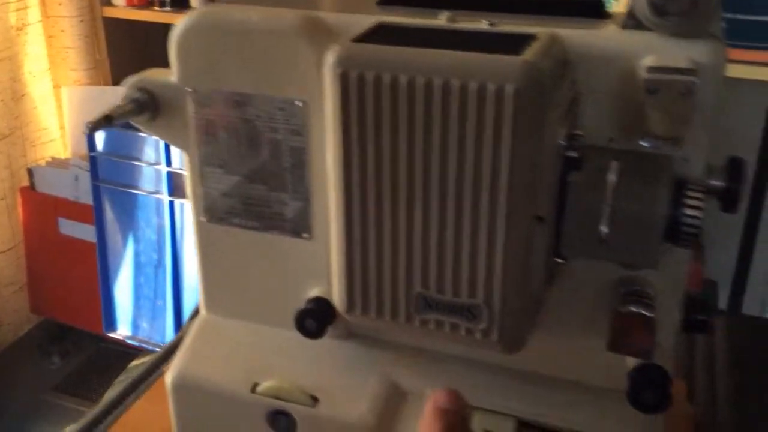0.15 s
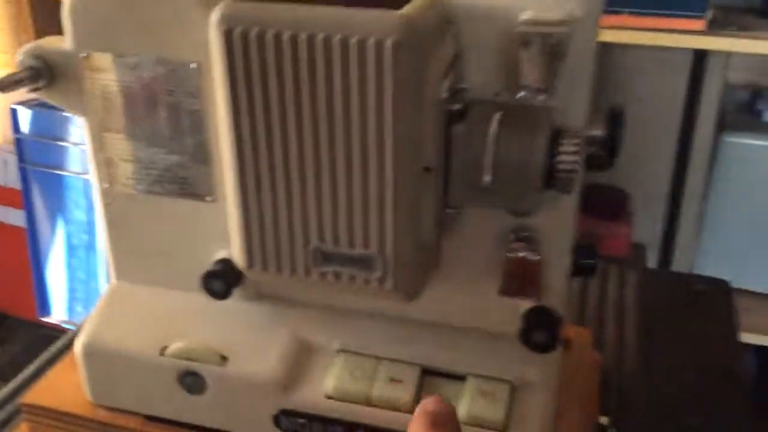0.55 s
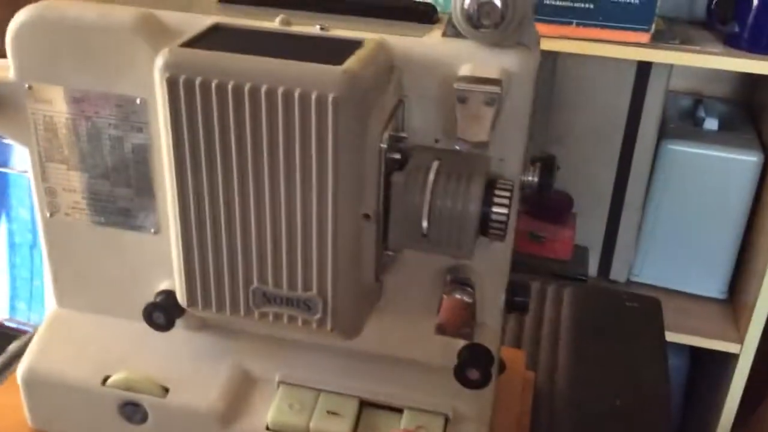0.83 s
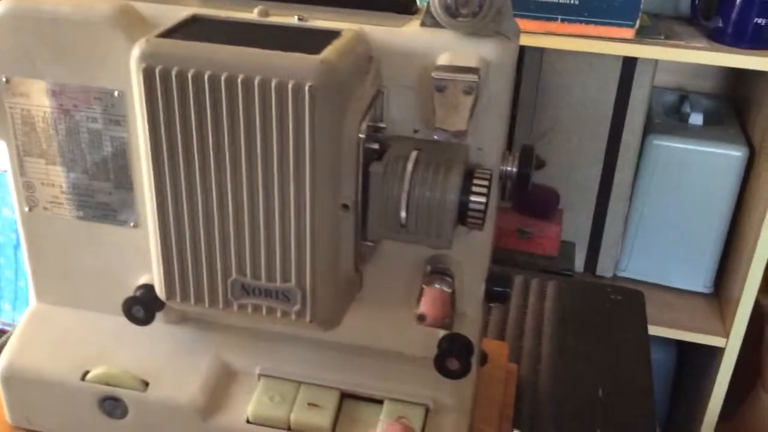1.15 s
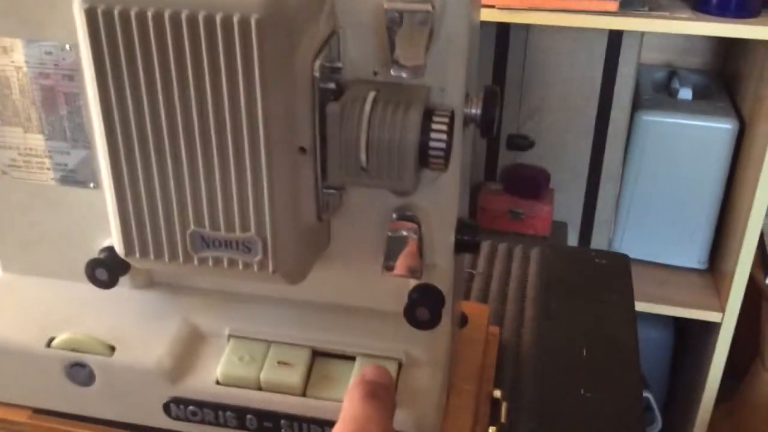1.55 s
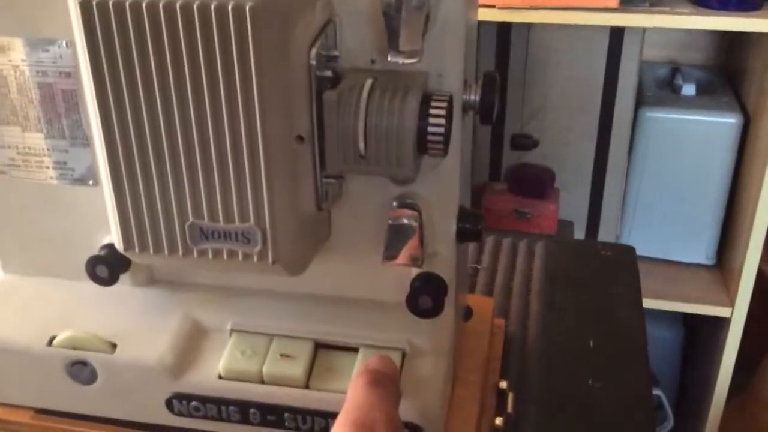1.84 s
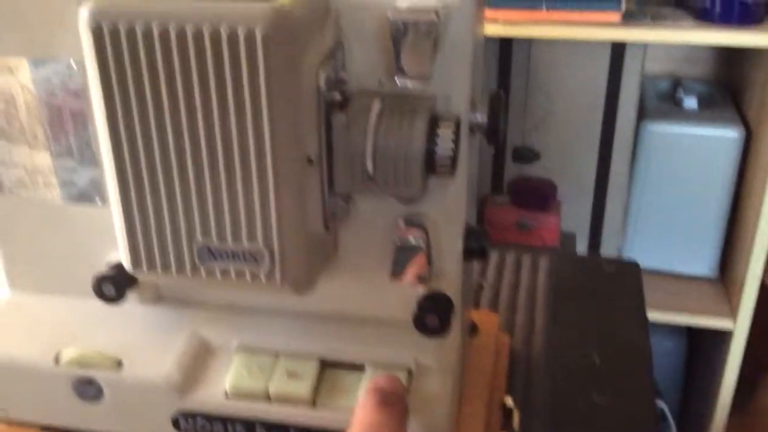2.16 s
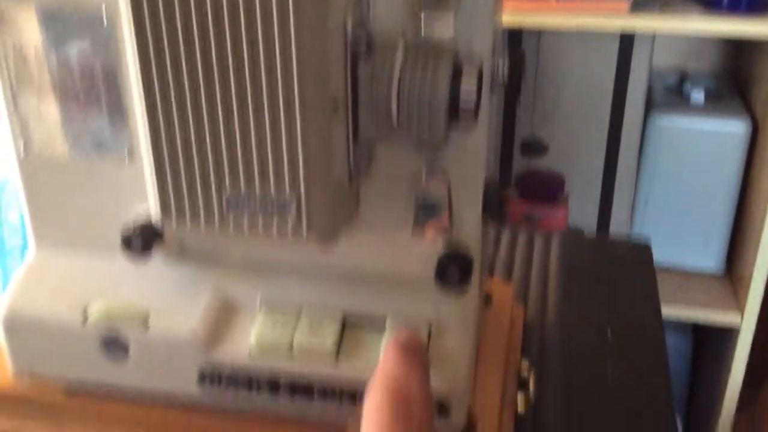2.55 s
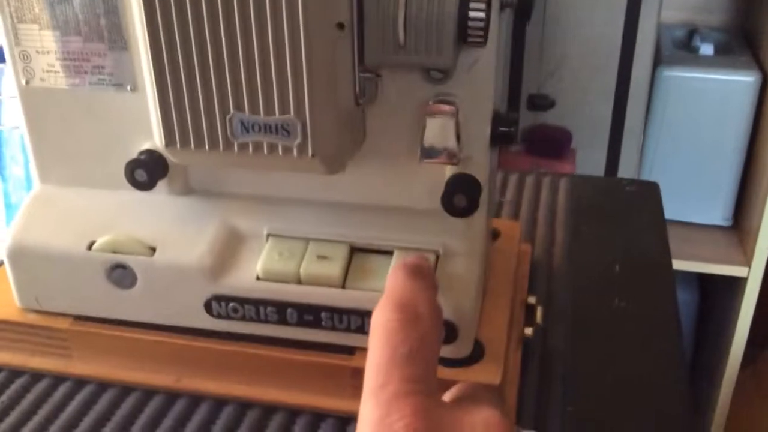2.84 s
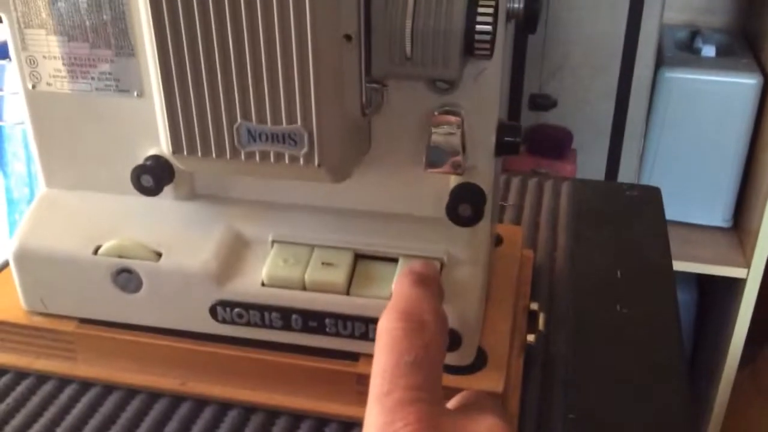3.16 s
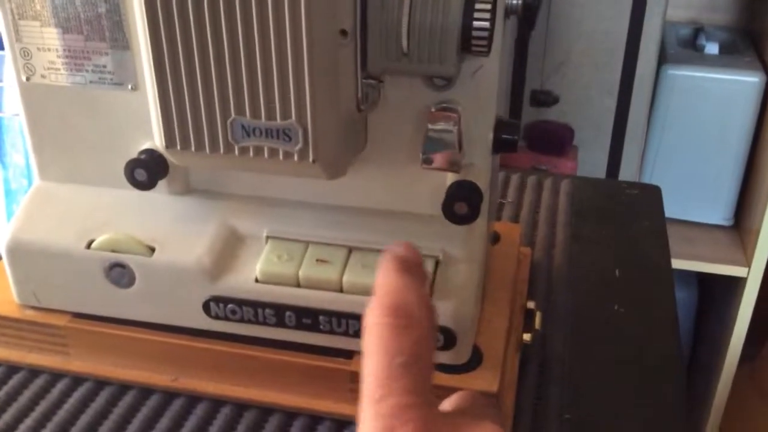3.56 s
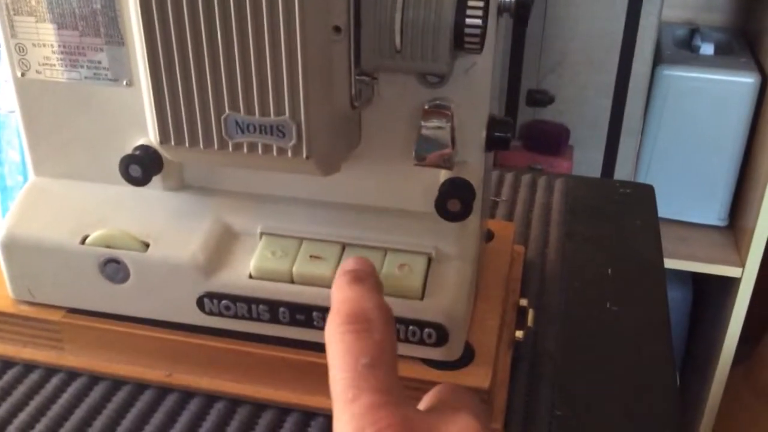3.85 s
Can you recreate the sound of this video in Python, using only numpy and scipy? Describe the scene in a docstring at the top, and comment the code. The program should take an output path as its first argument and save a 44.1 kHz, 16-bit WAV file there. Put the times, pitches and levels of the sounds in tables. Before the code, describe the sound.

A small film projector starts with a clack and runs with a fast, throbbing rattle over motor whine and fan air. A loud button clack stops it and a second button snaps, close to the microphone in a quiet room.

```python
"""A small film projector, close to the microphone in a furnished room, runs up to 18 frames a second.
It engages with a clack and a metallic knock. Each pull of the claw makes the gate throb near 550 Hz,
over motor whine, mains hum, fan air and gear rattle. Near 3.4 s a key clacks loudly and stops the drive;
a second key snaps and settles, leaving the quiet room."""
import sys
import numpy as np
from scipy import signal
from scipy.fft import rfft, irfft
from scipy.io import wavfile
from scipy.ndimage import uniform_filter1d

SR = 44100
rng = np.random.default_rng(int(sys.argv[2]) if len(sys.argv) > 2 else 0)


def put_to_file(sound):
    """Save the sound as 16-bit audio at rate SR, in the file named by the first command-line argument."""
    columns = np.atleast_2d(sound).T  # one column per channel
    safe = np.clip(columns, -1, 1)
    whole_steps = np.round(safe * 32767)
    wavfile.write(sys.argv[1], SR, whole_steps.astype(np.int16))


N = 176400


def undb(db):
    """Decibels to gain."""
    return 10 ** (np.asarray(db) / 20)


def colour(x, spectrum, tilt_db=0):
    """Shape a signal by (freq_hz, level_db) points and a tilt per octave; rms 1."""
    hz, db = np.array(spectrum, float).T
    octave = np.log2(np.maximum(np.fft.rfftfreq(len(x), 1 / SR), 1))
    gain = undb(np.interp(octave, np.log2(hz), db) + tilt_db * np.maximum(octave, np.log2(hz[0])))
    bass_cut = np.minimum(2 ** octave / hz[0], 1) ** 2
    shaped = irfft(rfft(x) * gain * bass_cut, len(x))
    return shaped / np.std(shaped)


def noise(spectrum, tilt_db=0):
    """Coloured noise, rms 1."""
    return colour(rng.standard_normal(N), spectrum, tilt_db)


def drift(rate_hz):
    """Smooth random wandering with spread 1."""
    hold = int(SR / rate_hz)
    steps = np.repeat(rng.standard_normal(N // hold + 1), hold)
    smooth = uniform_filter1d(uniform_filter1d(steps, hold), hold)[:N]
    return smooth / np.std(smooth)


def fade(age, t60_s):
    """Exponential decay that starts at age zero."""
    return (age >= 0) * np.exp(-np.log(1000) * np.maximum(age, 0) / t60_s)


def onset(age, rise_s):
    """Smooth rise from age zero."""
    return 1 - np.exp(-np.maximum(age, 0) / rise_s)


def ring(age, modes):
    """Damped modes struck at age zero."""
    return sum(undb(db) * fade(age, t60_s) * np.sin(2 * np.pi * hz * age) for hz, t60_s, db in modes)


# Rotor whine, loudest as it climbs through a resonance of the casing: time_s, pitch_hz, level_db
ROTOR_WHINE = [(0, 201.3, -86), (.12, 215.9, -66), (0.198, 237.8, -52), (.259, 242.5, -45.5),
               (.339, 247, -48), (.48, 251, -57), (.9, 263, -55), (1.22, 258.5, -52.5), (1.45, 264, -54.5),
               (1.78, 266.5, -57), (1.99, 258.5, -54), (2.47, 267, -58), (2.72, 263, -53), (3.35, 265, -57)]
# Its overtones: harmonic_number, level_db
WHINE_OVERTONES = [(2, -58.5), (3, -63.5), (4, -63)]
# Mains hum without strain: pitch_hz, level_db
MAINS_HUM = [(100, -80), (200, -61.7)]

def motor(t, strain, waver_db=0.5, wobble=0.003, strain_db=10):
    """The rotor whines; the windings hum, more strongly while the motor pulls up."""
    times, pitch_hz, level_db = np.array(ROTOR_WHINE).T
    phase = 2 * np.pi * np.cumsum(np.interp(t, times, pitch_hz) * (1 + wobble * drift(25))) / SR
    whine = undb(np.interp(t, times, level_db) + waver_db * drift(17)) * np.sin(phase)
    whine += sum(undb(db + waver_db * drift(11)) * np.sin(n * phase) for n, db in WHINE_OVERTONES)
    hum = sum(undb(db + strain_db * strain + 2.5 * drift(6.6)) * np.sin(2 * np.pi * hz * t)
              for hz, db in MAINS_HUM)
    return np.sqrt(2) * (whine + hum)


# Fan air from close by: freq_hz, relative_db
FAN_SPECTRUM = [(40, -15), (56, -2), (75, -15), (160, -9), (225, -3), (320, -16.5), (400, -1), (480, -1.5),
                (535, 4), (600, 0.5), (680, -10.5), (900, -3.5), (1120, -6), (1290, -12.5), (1950, -13),
                (2500, -21), (3300, -19.5), (4200, -25), (5500, -23.5), (6600, -28), (7900, -26.5),
                (9000, -21.5), (10700, -23.5), (13000, -23), (16000, -27)]

def fan(bands=24, level_db=-48, drift_db=1.44, flicker_db=0.53):
    """Air rushes from the fan; each band drifts slowly and flickers."""
    air = rfft(noise(FAN_SPECTRUM))
    log_bin = np.log(np.arange(len(air)) + 1)
    band_position = np.interp(log_bin, np.log([100 * N / SR, len(air)]), [0, bands - 1])  # from 100 Hz up
    out = np.zeros(N)
    for k in range(bands):
        band = irfft(air * np.maximum(1 - abs(band_position - k), 0), N)
        out += band * undb(drift_db * drift(3) + flicker_db * drift(40))
    return undb(level_db) * out


# Gear rattle from close by: freq_hz, relative_db
GEAR_SPECTRUM = [(500, -11.5), (980, -3), (1350, -13.5), (1900, -4), (2600, -4), (3300, -2), (5000, -13.5),
                 (15000, -24)]

def gears(strain, ticks_per_s=500, scatter_db=1.5, level_db=-62.5, strain_db=4.5):
    """Teeth and sprockets make dense small ticks, louder under strain."""
    ticks = (rng.random(N) < ticks_per_s / SR) * undb(scatter_db * np.clip(rng.standard_normal(N), -2, 2))
    age = np.arange(SR // 20) / SR
    tick_sound = rng.standard_normal(len(age)) * fade(age, t60_s=0.029)
    rattle = signal.fftconvolve(ticks, tick_sound)[:N]
    return undb(level_db + strain_db * strain) * colour(rattle, GEAR_SPECTRUM)


def nearby_echoes(x, count=7, gain=0.15, drift_s=.00007):
    """Nearby surfaces add short echoes that shift as the microphone moves; they comb the treble."""
    treble = signal.sosfilt(signal.butter(2, 1200, "high", fs=SR, output="sos"), x)
    upsampled = signal.resample_poly(treble, up=4, down=1)
    grid = np.linspace(0, N, len(upsampled), endpoint=False)
    lags_s = [lag + drift_s * drift(1.5) for lag in rng.uniform(0.000986, .009, count)]
    return x + gain * sum(np.interp(np.arange(N) - lag * SR, grid, upsampled) for lag in lags_s)


# Resonances, each loudest from one angle: pitch_hz, width_hz, level_db, loudest_at_s, spread_s
HOUSING_WHISTLES = [(1699, 45, -67.5, 1.4, 2.7), (1992, 76, -66, 3.4, 2.1), (3325, 270, -66, 0.92, 0.66),
                    (3430, 210, -61, 0.14, 0.044), (4180, 78, -70.5, 1.42, 0.49),
                    (8400, 220, -71, 3.15, .5), (10020, 290, -69, 2.1, .8)]

def whistles(t, drift_db=1):
    """Thin resonances, fed by air and gears, come and go as the microphone moves along the housing."""
    freq_hz = np.fft.rfftfreq(N, 1 / SR)
    out = np.zeros(N)
    for pitch_hz, width_hz, level_db, loudest_at_s, spread_s in HOUSING_WHISTLES:
        resonance = 1 / (1 + (2 * (freq_hz - pitch_hz) / width_hz) ** 2)
        band = irfft(rfft(rng.standard_normal(N)) * resonance, N)
        passing = np.exp(-.5 * ((t - loudest_at_s) / spread_s) ** 2)
        out += undb(level_db - drift_db * drift(3.7)) * passing * band / np.std(band)
    return out


# The furnished room behind the projector: freq_hz, relative_db
ROOM_SPECTRUM = [(18, -53.5), (30, -26), (49, -7.5), (143, -8), (180, -8.5), (374, -19), (426, -24.5),
                 (524, -15.5), (581, -19.5), (1370, -24), (2770, -39.5), (15000, -47)]

def room_tone(level_db=-60):
    """A low, faint rush that wavers by about a decibel."""
    return undb(level_db + drift(15)) * noise(ROOM_SPECTRUM)


# Speed of the drive: time_s, frames_per_s
DRIVE_SPEED = [(0.0, 14.064), (0.1, 14.989), (0.28, 17.122), (0.55, 17.366), (0.8, 18.163), (1.0, 17.909),
               (1.22, 17.777), (1.45, 18.236), (1.75, 18.429), (1.97, 17.685), (2.2, 18.142),
               (2.45, 18.494), (2.7, 18.024), (3.0, 18.304), (3.37, 18.429)]
# Load on the claw as the drive takes up: time_s, gain_db
CLAW_LOAD = [(0, -11), (.16, -2.5), (.33, -3), (.52, 1), (1.1, 0.5), (1.5, -0.2), (2.3, 0), (3.35, -1.5)]
# Swells of gate and case in one frame: delay_s, base_pitch_hz, rise_s, decay_s, level_db, scatter_db
GATE_SWELLS = [(-.0175, 530, .007, .0055, -45.5, 3), (0, 556, .0057, .0061, -30.9, .4),
               (.0035, 405, .006, .006, -51, 2), (.008, 232, .007, .007, -53.5, 3),
               (.0148, 524, .005, .009, -47.5, 2)]
# Taps of the claw in one frame: delay_s, gain_db
CLAW_TAPS = [(-.0095, -13), (-.0052, -3), (.0014, -5.5), (.0095, -9)]
# Gate modes that the taps ring: pitch_hz, t60_s, level_db
GATE_RING = [(825, 0.03, -58), (913.4, 0.04, -43.5), (1048, 0.048, -45), (1980, 0.013, -51.5),
             (3270, 0.019, -53)]

def claw(t, pitch_follow=.43, detune=0.0021, tap_scatter_db=2.5, tap_jitter_s=.0001):
    """Once a frame the claw pulls the film: the gate swells and dies away, and the claw taps in and out."""
    frame_rate = np.interp(t, *np.array(DRIVE_SPEED).T)
    frames = np.cumsum(frame_rate) / SR - .42  # the first pull comes partway into a frame
    throb, taps = np.zeros(N), np.zeros(N)
    for pull_s in np.interp(np.arange(int(frames[-1])), frames, t):
        near = slice(max(int(pull_s * SR) - SR // 20, 0), int(pull_s * SR) + SR // 20)
        pitch_ratio = (np.interp(pull_s, t, frame_rate) / np.median(frame_rate)) ** pitch_follow
        for delay_s, base_hz, rise_s, decay_s, level_db, scatter_db in GATE_SWELLS:
            force, sharpness = rng.standard_normal(2)
            age = t[near] - pull_s - delay_s
            swell = np.where(age < 0, np.exp(-(age / rise_s) ** 2), 1 / np.cosh(np.pi / 2 * age / decay_s))
            pitch_hz = base_hz * pitch_ratio * (1 + detune * sharpness)
            throb[near] += undb(level_db + scatter_db * force) * swell * np.sin(2 * np.pi * pitch_hz * age)
        for delay_s, gain_db in CLAW_TAPS:
            force, lateness = rng.standard_normal(2)
            tap_s = pull_s + delay_s + tap_jitter_s * lateness
            taps[np.clip(int(tap_s * SR), 0, N - 1)] += undb(gain_db + tap_scatter_db * force)
    ringing = signal.fftconvolve(taps, ring(t[:SR // 10], GATE_RING))[:N]
    return (throb + ringing) * undb(np.interp(t, *np.array(CLAW_LOAD).T))


# Knocks as the drive engages: start_s, gain_db
LEVER_KNOCKS = [(0.0726, 2), (.174, -23), (0.192, -11.5)]
# Lever modes that they ring: pitch_hz, t60_s, level_db
LEVER_RING = [(1070, 0.066, -41), (1215, 0.038, -37), (1448, 0.067, -39), (1670, 0.054, -34.5),
              (3020, 0.08, -54), (3483, 0.055, -48), (4990, .06, -50)]
# Chatter of loose parts: freq_hz, relative_db
CHATTER_SPECTRUM = [(900, -16), (1600, 2), (2300, -16), (3200, -3), (5500, -3), (12000, -16)]

def levers(t, chatter_db=-48):
    """Levers ring as the drive takes up; loose parts chatter briefly after the first knock."""
    age = t - LEVER_KNOCKS[0][0]
    chatter = undb(chatter_db + 2.3 * drift(200)) * noise(CHATTER_SPECTRUM) * fade(age, t60_s=0.35)
    return chatter + sum(undb(db) * ring(t - start_s, LEVER_RING) for start_s, db in LEVER_KNOCKS)


# Key clacks at close range: start_s, crack_db, thud_db, tilt_db_per_octave, ring_db, room_db
KEY_CLACKS = [(0.073, -28.5, -48, -1.5, -37, -52), (3.3679, -10, -36.5, 0, -2, -23.5),
              (3.369, -8, -36.5, -1.5, -30, -29.5), (3.478, -50, -63, 2, -50, -54.5),
              (3.499, -20, -50.5, 3.1, -26, -34.5), (3.5302, -37, -66, -2, -36, -42.5),
              (3.5426, -26.5, -38.5, -3.3, -22, -45), (3.6184, -50, -72, -1.5, -52, -64.5)]
# Key slide, first key, second key (duller at the very top) and case thud: freq_hz, relative_db
SLIDE_SPECTRUM = [(1500, -22.5), (3000, -7.5), (4000, 4), (4800, -1), (5800, -5.5), (8000, -19),
                  (15000, -25.5)]
FIRST_KEY_SPECTRUM = [(150, -33), (520, -4), (750, -12), (1150, -4.5), (1370, -9), (1620, 6), (2100, 4),
                      (2500, -3), (3700, -0.5), (4400, -13), (5500, 0), (6400, -8.5), (10000, -5.5),
                      (10580, 6.5), (11000, -3), (12200, 2), (14000, -7), (16000, -12.5)]
SECOND_KEY_SPECTRUM = [(150, -22), (700, -3), (1600, 0), (2200, -4), (4300, -1), (7500, -6), (8600, -1.5),
                       (11000, -9.5), (12300, -11), (14000, -14), (16000, -17)]
THUD_SPECTRUM = [(80, -25), (150, -13), (240, 3.5), (320, -16.5), (460, -1), (750, -8), (1300, -19.5),
                 (8000, -62.5)]
# Modes of key and chassis: pitch_hz, t60_s, level_db
KEY_RING = [(246, .17, -35), (443, .1, -37), (556, .13, -28), (1700, .1, -27), (1974, .08, -27.5),
            (2166, .08, -29.5), (3085, .1, -36), (3803, .12, -35), (5295, .1, -33), (5560, .12, -33),
            (10480, .12, -33), (10665, .1, -27), (11617, .13, -32), (12200, .1, -33)]

def keys(t, slide_s=3.365, slide_spread_s=.008, slide_db=-42, second_key_s=3.45):
    """Each clack is a crack, a thud of the case, ringing metal and a short room tail."""
    # the stopping key slides before it gives way
    out = undb(slide_db) * noise(SLIDE_SPECTRUM) * np.exp(-((t - slide_s) / slide_spread_s) ** 2)
    for start_s, crack_db, thud_db, tilt_db, ring_db, room_db in KEY_CLACKS:
        near = slice(int(start_s * SR), int(start_s * SR) + SR // 2)
        age = t[near] - t[near][0]
        spectrum = FIRST_KEY_SPECTRUM if start_s < second_key_s else SECOND_KEY_SPECTRUM
        crack = undb(crack_db) * noise(spectrum, tilt_db)[near] * fade(age, t60_s=.016)
        thud = undb(thud_db) * noise(THUD_SPECTRUM)[near] * fade(age, t60_s=.17)
        metal = undb(ring_db) * ring(age, KEY_RING)
        tail = undb(room_db) * noise(spectrum, tilt_db)[near] * fade(age, t60_s=.17)
        out[near] += onset(age, rise_s=.0005) * (crack + thud + metal) + onset(age, rise_s=.004) * tail
    return out


def scene(stop_s=3.385, run_down_s=0.054, strain_s=0.2):
    """One microphone beside the projector: the drive runs until the key stops it; the room stays."""
    t = np.arange(N) / SR
    strain = np.exp(-t / strain_s)
    coast = np.exp(-np.maximum(t - stop_s, 0) / run_down_s)
    whirr = motor(t, strain) + nearby_echoes(fan() + gears(strain)) + whistles(t)
    drive = coast * whirr + coast ** 3 * claw(t)  # the claw falls silent first
    return (drive + room_tone() + levers(t) + keys(t))[None]


def record(dry, bass_hz=36, top_hz=15900):
    """The recorder cuts the deepest bass and the top."""
    thinned = signal.sosfilt(signal.butter(4, bass_hz, "high", fs=SR, output="sos"), dry)
    return signal.sosfilt(signal.ellip(10, .2, 80, top_hz, fs=SR, output="sos"), thinned)


dry = scene()
out = record(dry)
put_to_file(out)
```